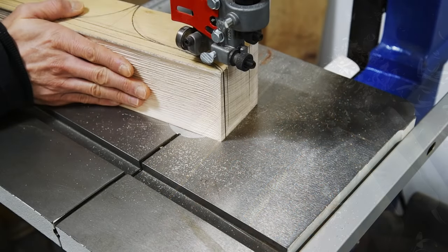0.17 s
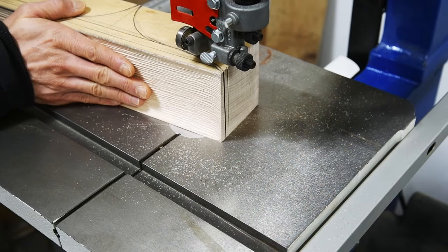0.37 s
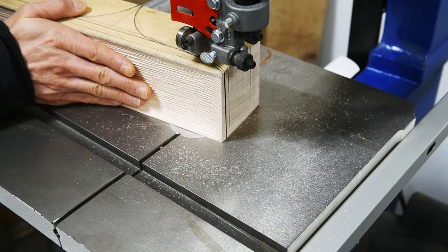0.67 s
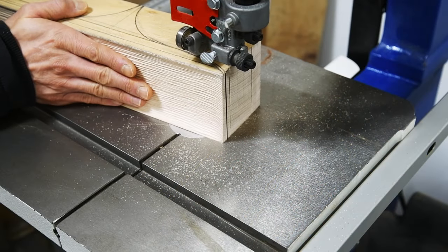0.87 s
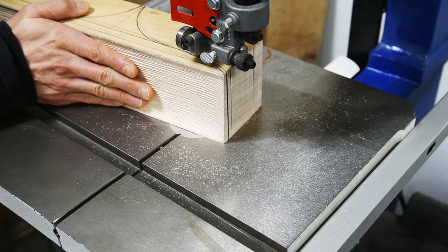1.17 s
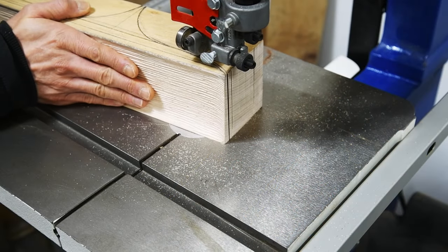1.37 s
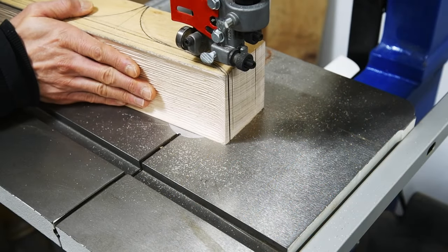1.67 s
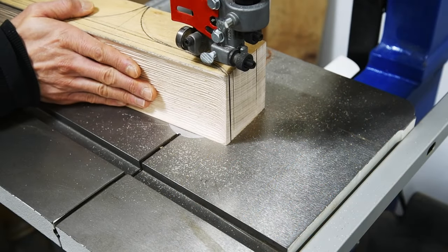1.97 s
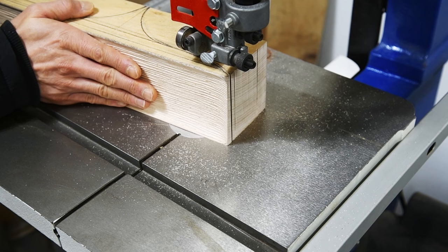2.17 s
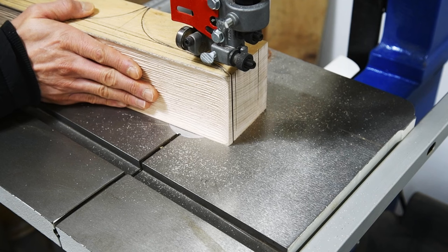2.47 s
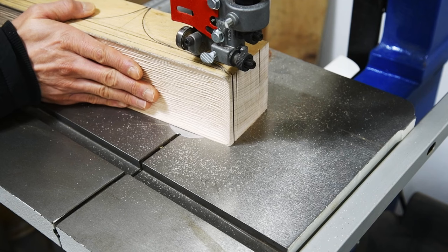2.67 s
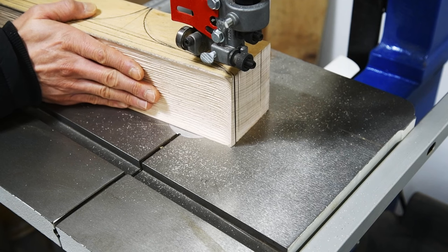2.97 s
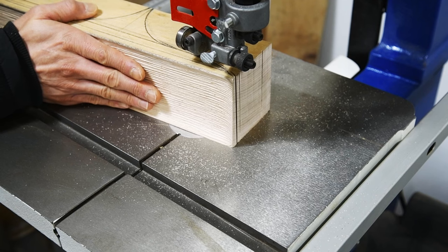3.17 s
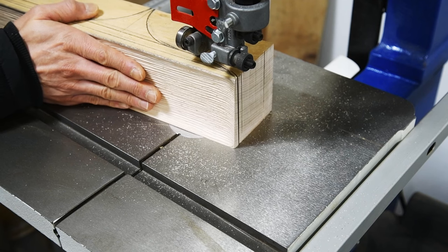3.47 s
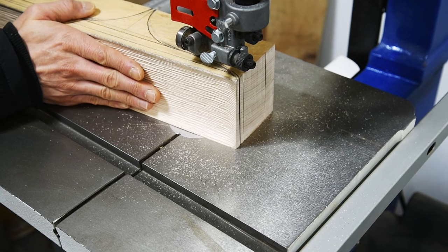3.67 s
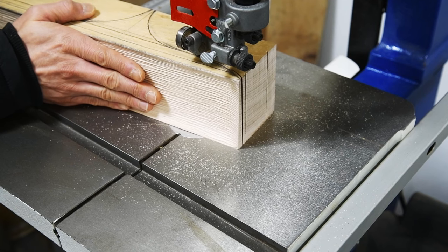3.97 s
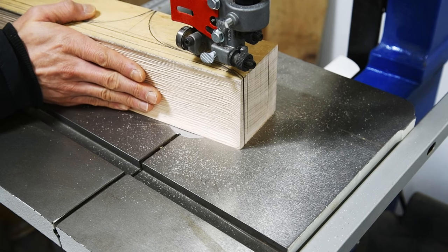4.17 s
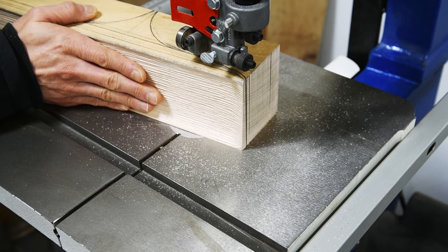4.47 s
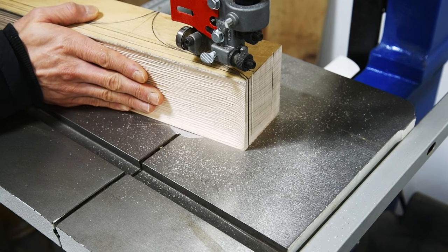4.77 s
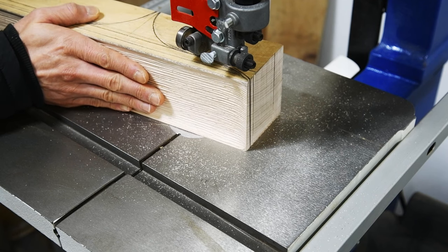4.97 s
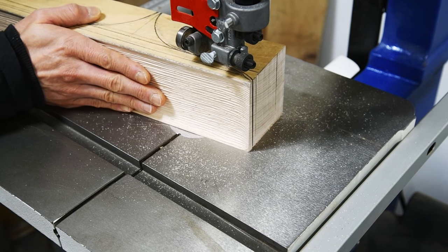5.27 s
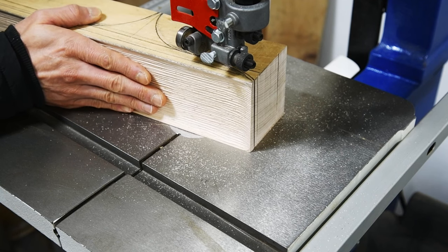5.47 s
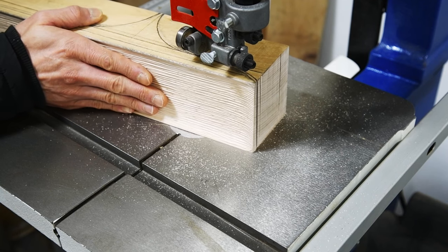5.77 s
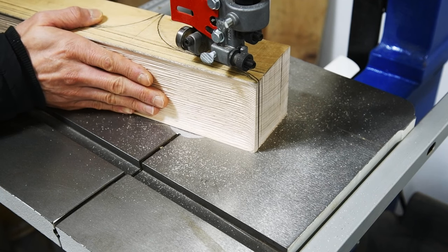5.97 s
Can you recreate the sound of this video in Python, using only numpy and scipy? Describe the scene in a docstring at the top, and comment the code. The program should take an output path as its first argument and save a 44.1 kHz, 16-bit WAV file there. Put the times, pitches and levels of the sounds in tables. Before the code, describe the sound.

A small band saw cuts a thick block of wood in a workshop, heard close and dry. A rough, high whine near 2 kHz throbs quickly over tooth buzz and fibre rasp. Short higher squeals and a few growling bites interrupt it early on. The sound swells strongly towards the middle, where the whine briefly turns into a clear singing tone, then settles slightly quieter into a steadier, fluttering cut.

```python
"""A small band saw whines near 2 kHz as it cuts into a thick block of wood, heard close.
The whine is a cluster of noisy blade modes and a locked pure tone, throbbing with the wheels.
Squeals on multiples of the tooth rate push the whine aside; passing teeth buzz as a row of partials.
Rasp is shaped noise, ringing steel and growling wood are resonances; low glides and a motor tone lie below.
The sound is saturated; it swells as the block is fed in, then settles."""
import sys
import numpy as np
from scipy import signal
from scipy.fft import rfft, irfft, next_fast_len
from scipy.io import wavfile
from scipy.ndimage import uniform_filter1d, map_coordinates

SR = 44100
rng = np.random.default_rng(int(sys.argv[2]) if len(sys.argv) > 2 else 0)


def digitize_waveform(pressure):
    """Quantize a signal to 16-bit integers and store it at the path in sys.argv[1].

    Rows of a 2-D input are taken as channels; values are limited to [-1, 1].
    """
    field = np.atleast_2d(pressure).T
    bounded = np.clip(field, -1, 1)
    quanta = np.round(bounded * 32767).astype(np.int16)
    wavfile.write(sys.argv[1], SR, quanta)


N = 269892  # samples


def amp(db):
    """Decibels to gain."""
    return 10 ** (np.asarray(db) / 20)


def unit(x):
    """x at rms 1."""
    return x / np.sqrt(np.mean(x ** 2) + 1e-20)


def running_rms(x, seconds):
    """The level of x over a sliding window."""
    window = max(int(seconds * SR), 8)
    return np.sqrt(np.abs(uniform_filter1d(x ** 2, window)) + 1e-20)


def curves(rows):
    """One value per sample for each column after the time."""
    s, *columns = np.transpose(rows)
    return [np.interp(np.arange(N) / SR, s, column) for column in columns]


def blend(entry, deep, depth):
    """Slide from the value at entry to the value deep in the cut."""
    return entry + (deep - entry) * depth


def wobble(rate, size=N):
    """A smooth random curve, rate knots a second."""
    count = int(size * rate / SR) + 4
    grid = np.arange(0, count, 1 / 8)
    smooth = map_coordinates(rng.standard_normal(count), [grid])
    return np.interp(np.arange(size) * rate / SR, grid, smooth)


def filtered(x, response):
    """x times a response of frequency."""
    m = next_fast_len(N + 8192, True)
    hz = np.fft.rfftfreq(m, 1 / SR)
    return irfft(rfft(x, m) * response(hz), m)[:N]


def coloured(x, points_hz, db):
    """x through a spectrum read on log frequency, at rms 1."""
    return unit(filtered(x, lambda f: amp(np.interp(np.log(f + 1), np.log(points_hz), db))))


def ringing(hz, width):
    """One resonance kept ringing by random tooth strikes, at rms 1."""
    m = next_fast_len(N, True)
    strikes = np.exp(2j * np.pi * rng.random(m // 2 + 1))
    offset = (np.fft.rfftfreq(m, 1 / SR) - hz) / (0.76 * width)
    return unit(irfft(strikes / (1 + offset ** 2), m)[:N])


def bump(t, centre, length):
    """A bell-shaped swell that stays above half power for its length."""
    return .5 ** (2 * ((t - centre) / length) ** 2)


# The blade's neighbouring modes.
# Each row: pitch in Hz, width in Hz, relative level in dB at entry, relative level in dB deep in the cut.
WHINE_MODES = [(2046, 45, -19.5, -5.5), (2114.6, 25.5, -8.5, -1.5), (2164, 21.3, -1.5, -7.5),
               (2193.5, 30, -10.5, 0), (2232.5, 32, -10, -6), (2315, 60, -11.5, -15)]
# The blade locks into its strongest mode. Each row: time in seconds, pure tone in dB re the rough whine.
LOCK = [(0, -6.5), (0.85, -5), (2.1, -3), (2.3, -9), (2.55, 1.5), (2.8, 3.5), (3.2, -4.5), (4.1, -7.5),
        (4.6, -7.5), (6.12, -10)]
# The locked tone drops as the cut loads the blade. Each row: time in seconds, mean pitch in Hz.
LOCK_PITCH = [(0, 2156), (2.25, 2156), (2.55, 2121), (6.12, 2121)]


def whine(depth, drift_hz, octave_below_db):
    """Close blade modes beat roughly at a level that friction holds steady; pushed hard, one sings clean."""
    rough = sum(amp(blend(entry, deep, depth)) * ringing(hz, width)
                for hz, width, entry, deep in WHINE_MODES)
    steady_rough = rough / running_rms(rough, seconds=0.071)
    # the kerf guides the blade, so the tone drifts less once the teeth are buried
    pitch = curves(LOCK_PITCH)[0] + drift_hz * (2 - depth) * wobble(25)
    swing = 2 * np.pi * np.cumsum(pitch) / SR
    # every second swing bites a little harder, which adds the octave below
    pure = np.sqrt(2) * (np.sin(swing) + amp(octave_below_db) * np.sin(swing / 2))
    x = steady_rough + amp(curves(LOCK)[0]) * pure
    return x / running_rms(x, seconds=0.028)


WHEEL_HZ = 13.52
# Blade pressure over one wheel turn.
# Each row: multiple of the wheel rate, swing in dB at entry, swing in dB deep in the cut.
THROB = [(1, 1.5, 0.6), (3, 0.5, -1.2), (5, 1, 0.9), (6, 2, 1.6)]


def pressure_db(depth):
    """The wheels press blade on wood in a repeating pattern: a slow pulse at entry, a fast flutter deep in."""
    turn = 2 * np.pi * WHEEL_HZ * np.arange(N) / SR
    return sum(blend(entry, deep, depth) * np.sin(order * turn + rng.uniform(0, 2 * np.pi))
               for order, entry, deep in THROB)


TOOTH_HZ, SAG_HZ = 783.5, 6  # tooth rate with the teeth clear, and its fall when they are buried


def tooth_hz(depth):
    """The tooth rate sags under load."""
    return TOOTH_HZ - SAG_HZ * depth


def sing(events, waver_hz, flutter_db):
    """Stick and slip feed one partial for a moment: a wavering tone that grows and dies."""
    out = np.zeros(N)
    for s, length, hz, db in events:
        waver, flutter = wobble(120), wobble(88)
        i = np.arange(max(int((s - 2 * length) * SR), 0), min(int((s + 2 * length) * SR), N))
        phase = 2 * np.pi * np.cumsum(hz + waver_hz * waver[i]) / SR
        level = amp(db + flutter_db * flutter[i]) * bump(i / SR, s, length)
        out[i] += level * np.sqrt(2) * np.sin(phase)
    return out


# Weaker catches come by chance, on any of these. Each entry: multiple of the tooth rate.
STRAY_MULTIPLES = (4, 6, 8, 9, 10, 13)
STRAY_S, STRAY_DB, STRAY_SPREAD_DB = 0.06, -16, 1  # length, level before the squeal trim, its scatter


def strays(count):
    """Brief, weak catches, one at random in each equal stretch of the cut, as rows like the squeals."""
    stretch_s = N / SR / count
    return [((k + rng.random()) * stretch_s, STRAY_S, rng.choice(STRAY_MULTIPLES),
             STRAY_DB + STRAY_SPREAD_DB * rng.standard_normal()) for k in range(count)]


# The teeth catch and the blade squeals.
# Each row: centre in seconds, length in seconds, multiple of the tooth rate, level in dB before the trim.
SQUEALS = [(0.05, 0.11, 6, -11), (0.12, 0.07, 4, -11), (0.36, 0.09, 4, -7.5), (0.44, 0.3, 7, -11.5),
           (0.63, 0.11, 4, -5.5), (0.96, 0.08, 4, -11), (0.99, 0.05, 10, -12), (1.24, 0.1, 7, -13),
           (1.34, 0.06, 4, -4.5), (1.55, 0.12, 4, -13), (1.815, 0.085, 4, -1.5), (2.11, 0.08, 4, -12.5),
           (2.3, 0.1, 10, -14.5), (2.33, 0.16, 7, -14), (2.34, 0.14, 8, -10.5), (2.42, 0.1, 4, -16),
           (2.6, 0.06, 7, -15), (2.98, 0.06, 6, -12), (4.39, 0.07, 4, -13), (5.44, 0.22, 6, -10.5),
           (5.79, 0.17, 8, -15.5)]


def squeals(depth):
    """Every catch sings on a whole multiple of the tooth rate at its centre."""
    rate = tooth_hz(depth)
    events = [(s, length, multiple * rate[min(int(s * SR), N - 1)], db)
              for s, length, multiple, db in list(SQUEALS) + strays(count=14)]
    return sing(events, waver_hz=15, flutter_db=3.0)


# The buzz of the passing teeth.
# Each row: multiple of the tooth rate, relative level in dB at entry, relative level in dB deep in the cut.
BUZZ = [(1, -29, -27.5), (2, -24.5, -25.5), (4, -14, -17), (5, -48, -43), (6, -21, -18.5), (7, -16, -23),
        (8, -22, -21.5), (9, -20.5, -18.5), (10, -16.5, -20.5), (11, -38, -42), (12, -22.5, -23),
        (13, -19.5, -25), (14, -31, -27), (16, -23, -25.5)]


def buzz(depth, waver_hz, scatter, wander_db):
    """Teeth pass at a rate that sags under load; their uneven set blurs the partials, the high ones most."""
    rate = tooth_hz(depth) + waver_hz * wobble(14)
    tooth = 2 * np.pi * np.cumsum(rate) / SR
    out = np.zeros(N)
    for order, entry, deep in BUZZ:
        level = amp(blend(entry, deep, depth) + wander_db * wobble(24))
        blur = scatter * np.sqrt(order) * wobble(50 + 10 * order)  # radians
        out += level * np.sqrt(2) * np.sin(order * tooth + blur)
    return out


def patchy(x, patchy_db):
    """x with brief, narrow patches of random gain."""
    z = signal.stft(x, nperseg=512)[2]
    field = rng.standard_normal(z.shape)
    for _ in range(2):
        across_pitch = uniform_filter1d(field, size=3, axis=0)
        field = uniform_filter1d(across_pitch, size=11, axis=1)
    return signal.istft(z * amp(patchy_db * unit(field)), nperseg=512)[1][:N]


# The colour of tearing fibres.
# Each row: frequency in Hz, relative density in dB per Hz at entry, the same deep in the cut.
RASP = [(25, -25, -38), (102, -47, -38), (252, -1, -6), (405, -8.5, -8.5), (970, -3, -5.5), (1480, -0.5, 1),
        (1920, -0.5, -1.5), (2860, 6.5, 3), (3470, 5, 0.5), (5200, 1.5, 2), (7140, -3, -2.5),
        (8500, -0.5, -5.5), (12200, -1, -2), (15100, -5, -11.5)]


def rasp(depth, clump_db, patchy_db):
    """Fibres snap under the teeth in dense, uneven clumps of shifting colour."""
    hz, entry, deep = np.transpose(RASP)
    snaps = patchy(rng.standard_normal(N), patchy_db) * amp(clump_db * wobble(450))
    return (1 - depth) * coloured(snaps, hz, entry) + depth * coloured(snaps, hz, deep)


# Ringing of guides and table.
# Each row: pitch in Hz, width in Hz, relative level in dB at entry, relative level in dB deep in the cut.
STEEL = [(548, 36, -21.5, -26), (1061, 33, -21.5, -27), (1356, 19, -30.5, -23.5), (1627, 150, -24, -23),
         (2913, 20, -19.5, -20), (3910, 8.4, -30, -25.5), (3983, 11.4, -20, -15.5), (4203, 15, -39, -19.5),
         (5690, 64, -34, -20.5), (6744, 92, -19, -16), (7600, 340, -21, -12), (8525, 200, -16.5, -20),
         (11100, 70, -27, -26), (14100, 110, -19, -19), (14740, 290, -22, -20)]


def steel(depth, wander_db):
    """Guides and table ring unevenly; the wood damps some modes and feeds others."""
    return sum(amp(blend(entry, deep, depth) + wander_db * wobble(12)) * ringing(hz, width)
               for hz, width, entry, deep in STEEL)


# A mode of the guides or table flares up.
# Each row: centre in seconds, length in seconds, mean pitch in Hz, level in dB before the trim.
FLARES = [(0.21, 0.05, 548, -16), (0.52, 0.06, 548, -19), (1.22, 0.23, 549, -18),
          (1.69, 0.074, 4000, -12.5), (1.92, 0.07, 546, -12.5), (3.35, 0.1, 4000, -16),
          (3.45, 0.25, 7750, -15.5), (3.92, 0.057, 3983, -13)]


def flares():
    """Single modes of the steel sing up briefly as wavering tones."""
    return sing(FLARES, waver_hz=16.5, flutter_db=2.0)


# The teeth bite into hard grain and the block growls.
# Each row: centre in seconds, length in seconds, level in dB in the mix before overload.
BITES = [(1.266, 0.065, -18), (1.407, 0.054, -12.5), (1.93, 0.1, -9.5), (2.332, 0.068, -15),
         (2.98, 0.05, -14.5)]
# The block's resonances. Each row: pitch in Hz, width in Hz, relative level in dB.
BLOCK = [(630, 100, -3), (800, 68, 0), (1450, 260, 0)]


def bites():
    """Hard grain shakes the block in short, rough swells."""
    t = np.arange(N) / SR
    force = sum(amp(db) * bump(t, s, length) for s, length, db in BITES)
    growl = unit(sum(amp(db) * ringing(hz, width) for hz, width, db in BLOCK))
    return force * growl


# Low tones glide as the teeth cross the grain.
# Each row: start in seconds, end in seconds, start in Hz, end in Hz, level in dB before the trim.
GLIDES = [(1.899, 2.25, 430, 90, -28), (2.279, 2.679, 500, 90.8, -27.5), (2.45, 2.92, 99.8, 140, -29),
          (2.604, 2.774, 238, 350, -28.5), (3.197, 3.522, 109, 560, -19.5), (4.42, 4.725, 238.6, 600, -20),
          (4.971, 5.253, 110.5, 460, -22.5), (5.406, 5.679, 230.3, 500, -26)]


def glides(waver_hz, flutter_db):
    """Faint, rough tones that slide through the bass."""
    out = np.zeros(N)
    for start, end, from_hz, to_hz, db in GLIDES:
        i = np.arange(int(start * SR), int(end * SR))
        u = np.linspace(0, 1, len(i))
        pitch = from_hz + (to_hz - from_hz) * u + waver_hz * wobble(81.6, size=len(i))
        level = amp(db + flutter_db * wobble(40.4, size=len(i)))
        swell = np.sqrt(np.abs(np.sin(np.pi * u)))
        out[i] += level * swell * np.sin(2 * np.pi * np.cumsum(pitch) / SR)
    return out


MOTOR_HZ = 712


def motor(level_db):
    """The thin, steady tone of the drive, its phase wandering slightly."""
    phase = 2 * np.pi * MOTOR_HZ * np.arange(N) / SR + 0.37 * wobble(6.73)
    return amp(level_db) * np.sqrt(2) * np.sin(phase)


# How far the teeth are buried. Each row: time in seconds, depth from 0 to 1.
DEPTH = [(0, 0.06), (2.1, 0), (3.1, 0.77), (6.12, 1)]
WHINE_DB, LOCK_GAIN = -0.23, 0.28  # base level of the whine; dB it gains for each dB of lock
YIELD_DB = 8.5  # what the whine loses when the squeals reach rms 1


def scene():
    """A squeal takes energy from the whine; the more either sings, the less goes into rasp and ringing."""
    depth = np.clip(curves(DEPTH)[0], 0, 1)
    singing = amp(1.5) * squeals(depth)
    caught = running_rms(singing, seconds=0.018)
    throb_db = pressure_db(depth)

    whine_wander_db = 0.93 * (1.5 - depth) * wobble(10)
    whine_db = WHINE_DB + LOCK_GAIN * curves(LOCK)[0] - YIELD_DB * caught + whine_wander_db
    blade = amp(whine_db + throb_db) * whine(depth, drift_hz=7.03, octave_below_db=-23)

    teeth = amp(-1.5) * buzz(depth, waver_hz=1.8, scatter=0.42, wander_db=4.0)
    fibres = amp(-5.0 + 1.9 * wobble(30)) * rasp(depth, clump_db=3.0, patchy_db=3)
    body = amp(-2.5) * steel(depth, wander_db=3.5)
    # what the singing leaves over for the rest of the cut
    share_db = -.7 * whine_db - 6 * caught - 0.23 * throb_db
    cutting = amp(share_db - 1.35) * (teeth + fibres + body)

    bass = amp(-0.2) * glides(waver_hz=27.2, flutter_db=3.5)
    mix = blade + singing + cutting + amp(2.0) * flares() + bites() + bass + motor(level_db=-30.5)
    return mix[None]


# How hard the block is fed. Each row: time in seconds, loudness in dB re full scale before the surge.
FEED = [(0, -53), (0.68, -52.5), (1.0, -50.5), (1.67, -44.5), (1.8, -41.5), (1.87, -42), (2.42, -37),
        (2.52, -35), (2.74, -35), (2.88, -36.5), (3.03, -39), (3.4, -41), (4.4, -42), (6.12, -41.5)]
SURGE_DB = 0.5  # the feed is uneven until the kerf steadies the blade
TOP_HZ = 15740  # nothing is heard above this


def record(dry):
    """Levelling and overload flatten the peaks; the loudness swells and settles, alike in both channels."""
    drive = dry[0] / running_rms(dry[0], seconds=0.059) * amp(2.0)
    flat = unit(drive / (1 + np.abs(drive) ** 6) ** (1 / 6))
    surge_db = SURGE_DB * (1 - curves(DEPTH)[0]) * wobble(14)
    loudness = amp(curves(FEED)[0] + surge_db)
    out = filtered(loudness * flat, lambda f: f < TOP_HZ)
    return np.array([out, out])


dry = scene()
out = record(dry)
digitize_waveform(out)
```